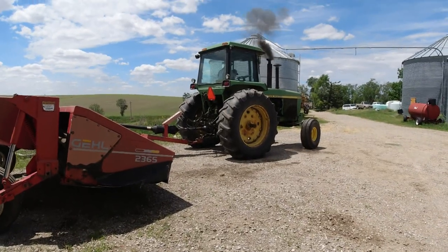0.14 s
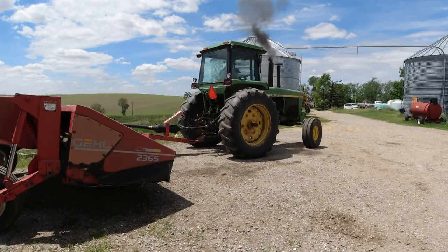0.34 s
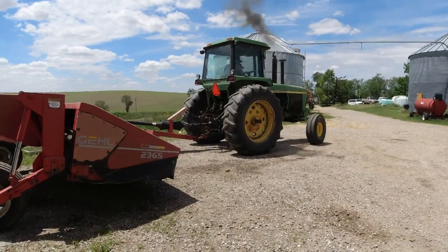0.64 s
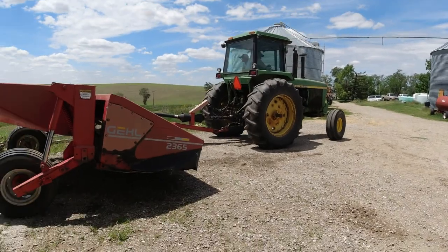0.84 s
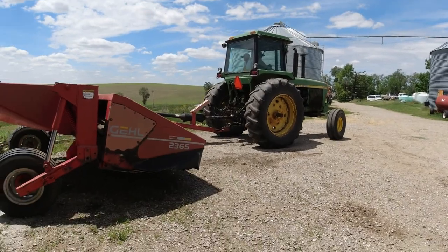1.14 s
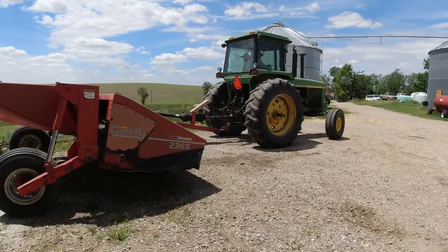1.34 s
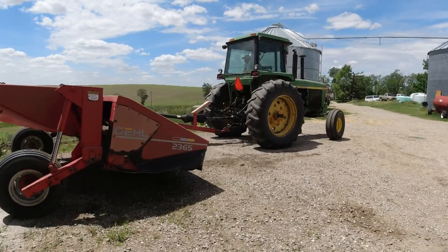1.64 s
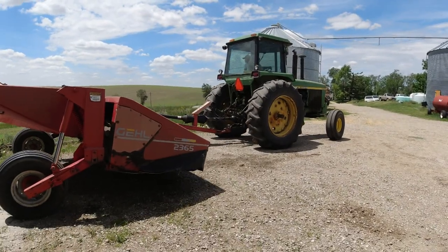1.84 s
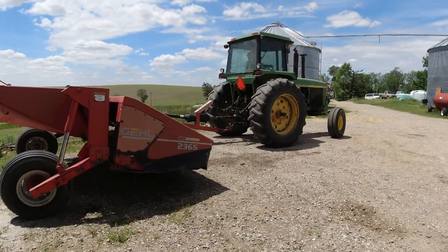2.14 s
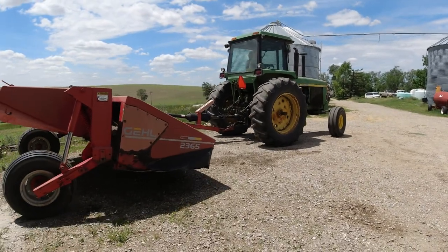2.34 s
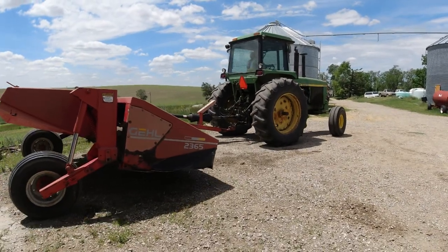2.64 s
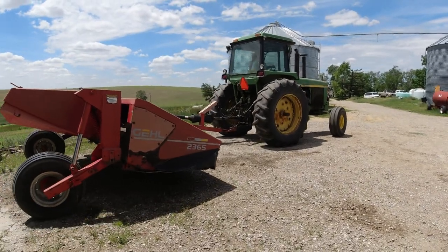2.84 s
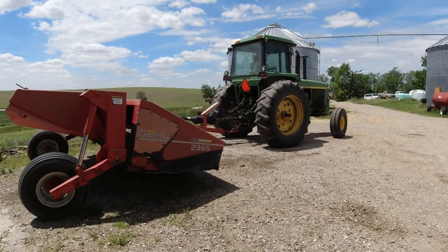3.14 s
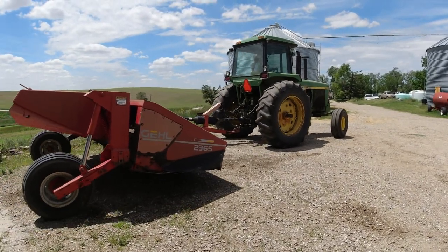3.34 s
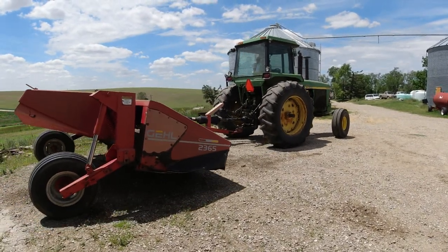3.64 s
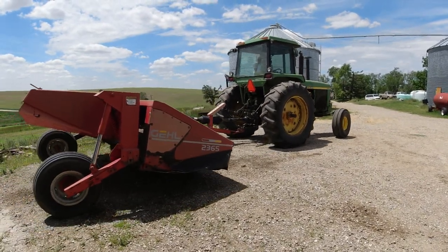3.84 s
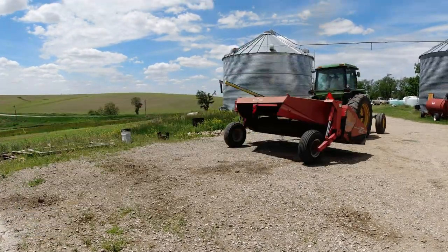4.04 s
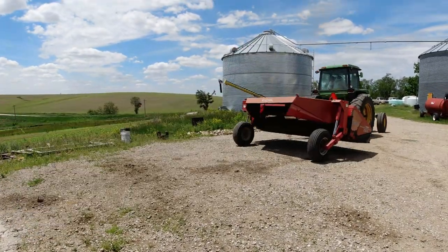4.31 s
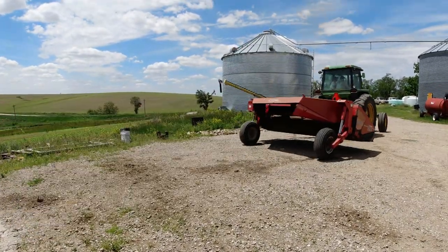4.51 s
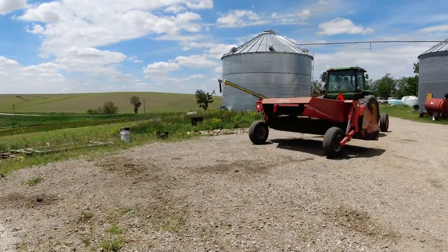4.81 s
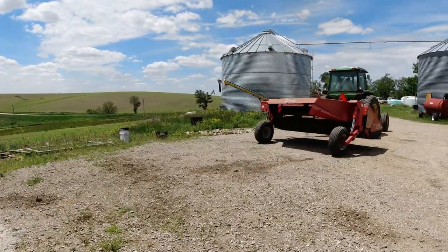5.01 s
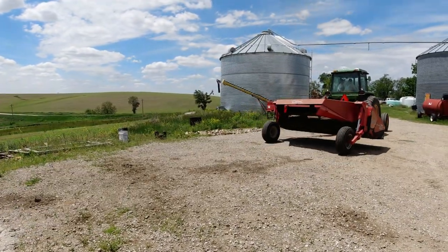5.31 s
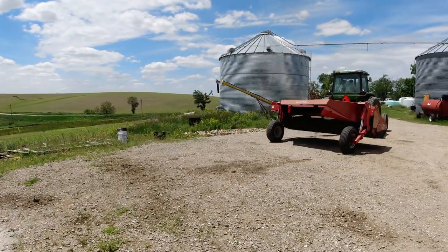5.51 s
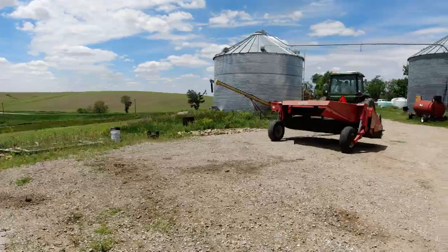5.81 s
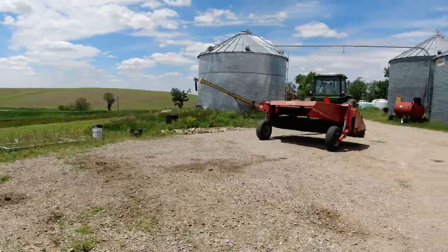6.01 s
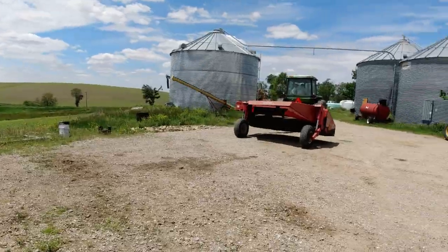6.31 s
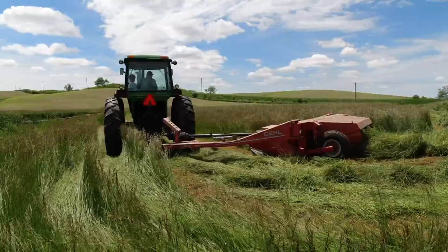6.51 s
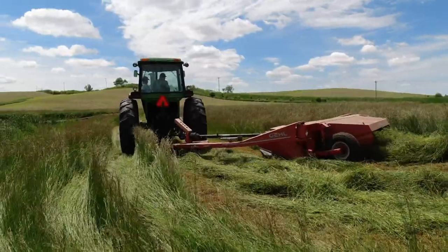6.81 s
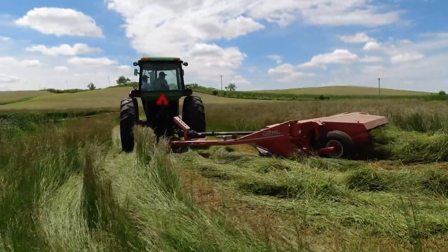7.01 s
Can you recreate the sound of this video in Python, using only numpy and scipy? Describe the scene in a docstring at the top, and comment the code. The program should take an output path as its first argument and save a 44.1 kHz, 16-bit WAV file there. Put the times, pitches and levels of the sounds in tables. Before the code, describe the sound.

From 0 to 0.7 s a six-cylinder diesel runs down from about 44 to 32 firings a second, barking then clattering, with a clank at 0.3 and a high screech near 0.66. An abrupt click at 0.73 changes the perspective: until 3.9 s it idles lumpily near 35 firings a second, with heavy puffs at 1.6, 2.6 and 3.0. The mower scrapes and drones every 0.34 s, with short steel squeaks and clanks at 1.2, 2.45-2.65 and 3.1. At 3.9 s another cut: a smooth deep boom around 61 Hz, fan hum, wavering gear whine and faint gravel ticks; clatter recedes, the boom sinks around 5.7-6.1 and partly recovers. At 6.5 s a cut to mowing until 7.2: faster throbbing exhaust near 85 Hz, dense cutter roar, wavering howl, booming wads and crackling hay. Faint open air throughout.

```python
"""A six-cylinder diesel tractor drops to a hunting idle, puffing and clattering, its mower turning slowly.
The view switches abruptly as it idles: the mower rubs once a turn, screeches and clanks.
A third passage drives off with a booming exhaust; the fourth mows hay at working speed.
Exhaust, fan and gears are tones locked to the firing rate; block, cutter, hay and rubbing are coloured
noise, knocks and harmonics; clanks are noise bursts with ringing modes. Faint open air runs throughout."""
import sys
import numpy as np
from scipy import signal
from scipy.fft import rfft, irfft, next_fast_len
from scipy.io import wavfile
from scipy.ndimage import uniform_filter1d, map_coordinates

SR = 44100
rng = np.random.default_rng(int(sys.argv[2]) if len(sys.argv) > 2 else 0)


def wav_record(signal):
    """Record a signal, one row per channel, as 16-bit PCM in the file named by sys.argv[1]."""
    frames = np.transpose(np.atleast_2d(signal))
    bounded = np.clip(frames, -1, 1)
    # unit amplitude maps onto the largest positive 16-bit level
    quanta = np.round(bounded * 32767).astype(np.int16)
    wavfile.write(sys.argv[1], SR, quanta)


N = 315756
TIME = np.arange(N) / SR

# bounds of the four passages: (time [s])
CUTS = [0, .725, 3.904, 6.503, 7.2]
START_S, SETTLED_S, LEAVING_S, FIELD_S, END_S = CUTS
# clicks where passages meet: (time [s], level [dB])
CUT_CLICKS = [(0.725, -25), (3.904, -18.5), (6.503, -20)]
# stereo width of every noise bed: (frequency [Hz], side against mid [dB])
WIDTH = [(250, -23), (700, -24.5), (1400, -15.5), (2800, -7.5), (5600, -3), (12000, 1)]
TOP_HZ = 16000  # upper limit of the sound

# Spectra are relative: every noise bed is brought to rms 1. Spreads are those of bell-shaped swells.
# spectrum of open air: (frequency [Hz], density [dB per Hz])
AIR_SPECTRUM = [(30, -14), (300, -13), (3000, -29), (9000, -51.5), (16000, -51.5)]

# stones ticking under the tyres: (time [s], level [dB])
GRAVEL_TICKS = [(4.048, -57), (4.445, -56), (4.932, -58), (5.282, -55)]
# spectrum of a grinding stone: (frequency [Hz], density [dB per Hz])
STONE_SPECTRUM = [(1500, -23), (3000, -2), (4000, -0.5), (5000, -8), (6500, -15), (8500, -44)]
STONE_SPREAD_S = .007

# clanks of the drive line: (time [s], crack [dB], steel ring [dB], steel brightness [dB per octave],
# hood ring [dB], bar knock [dB])
CLANKS = [(.309, -37.5, -47.5, 11, -36.5, -32.5), (1.195, -58, -81, 0, -67, -35),
          (2.441, -34, -42, -8, -44, -43), (2.511, -42, -75, 1, -43, -49),
          (2.664, -31, -73, 0, -37.5, -27.5), (3.073, -41, -68, 0, -46, -58)]
# ringing modes of the steel parts: (frequency [Hz], level [dB], decay by 60 dB [s])
STEEL_MODES = [(5426, -12, .15), (6158, -4, .05), (6591, -5, .3), (7550, -14, .081), (8200, -18, .04),
               (9272, -9, .15), (10500, -11, .055), (10960, -15, .04), (12350, -23, .07)]
# ringing modes of the sheet hood: (frequency [Hz], level [dB], decay by 60 dB [s])
HOOD_MODES = [(544, -5, 0.35), (831, 10.5, 0.096), (895, 6, 0.24), (1013, 0, 0.37), (1020, -2.5, 0.29),
              (1235, -6, 0.1), (2300, 5, 0.096)]
# ringing modes of the knocked bar: (frequency [Hz], level [dB], decay by 60 dB [s])
BAR_MODES = [(2380, -12, 0.033), (3450, -12, 0.15), (3980, -5.5, 0.025), (3840, -13, 0.06),
             (4900, -14.5, 0.11), (6170, -22, 0.16)]
# spectrum of a clank's crack: (frequency [Hz], density [dB per Hz])
CRACK_SPECTRUM = [(600, 9.5), (1300, 9.5), (2400, 1.5), (3600, 6.5), (4700, -4.5), (6300, -1.5),
                  (7800, -21), (11000, -65), (15000, -66)]
CRACK_RISE_S = 0.0012
CHATTER_RAD, CHATTER_S = 0.57, 0.023  # phase shake of a struck part (rms), its decay constant

# successive turns of the mower: (scrape [dB], hood drone [dB])
RUBS = [(-62, -42.5), (-51, -39.5), (-52.5, -42), (-50.5, -41), (-50.5, -42), (-48.5, -38), (-50, -37),
        (-52, -39), (-51.5, -38.5)]
FIRST_RUB_S, TURN_S, RUB_SPREAD_S = 0.8526, .3435, 0.057
# screeches of steel on steel: (time [s], spread [s], pitch [Hz], level [dB])
SCREECHES = [(0.66, 0.041, 4080, -45), (0.87, 0.059, 1805, -44), (0.884, 0.028, 2115, -48.5),
             (0.872, 0.031, 3985, -49), (0.902, .025, 6130, -57), (1.087, 0.23, 1754, -52),
             (1.2, 0.011, 3960, -45), (1.55, 0.017, 4232, -56), (1.891, 0.016, 5417, -50),
             (2.239, 0.023, 4203, -51), (2.488, 0.039, 1031, -40.5), (2.583, 0.065, 6120, -56),
             (2.628, .01, 3040, -45), (2.878, .008, 3103, -43), (2.906, 0.041, 4070, -53),
             (2.908, 0.0098, 5700, -51.5), (3.08, 0.011, 5500, -48), (3.615, 0.057, 5388, -59)]
SCREECH_GRIT_DB = -7  # scraping that comes with a screech, against it
SCREECH_WAVER, SCREECH_WIDTH = 0.012, .13  # pitch unsteadiness and roughness rate, shares of the pitch
# spectrum of the scrape: (frequency [Hz], density [dB per Hz])
SCRAPE_SPECTRUM = [(900, -5.5), (1800, -7.5), (2700, 6.5), (4100, 1), (4900, -4.5), (6200, -7), (7200, -15),
                   (8500, -36.5), (13000, -40), (16000, -58)]
# resonances and dips of the mower's steel frame: (centre [Hz], width [Hz], lift [dB])
FRAME = [(1740, 63, -6), (2190, 42, 5.5), (2510, 88, 10.5), (3550, 91, 8), (4130, 270, 6), (4600, 55, 6),
         (5270, 160, 10), (6080, 59, 11.5)]
# spectrum of the hood's drone: (frequency [Hz], density [dB per Hz])
DRONE_SPECTRUM = [(150, 4.5), (330, -7.5), (550, 1), (950, -5.5), (1200, -7.5), (2000, -20), (4000, -53)]
DRONE_SLIDE_S, DRONE_SPLIT_HZ = 0.023, 780  # the drone's top comes this early, its bottom this late
# spectrum of a short thin hiss: (frequency [Hz], density [dB per Hz])
SIZZLE_SPECTRUM = [(5500, -39), (6600, 4), (7500, 1), (8200, -7), (9200, -35)]
SIZZLE_S, SIZZLE_SPREAD_S, SIZZLE_DB = 0.684, 0.035, -62

# knock strength of each cylinder, in firing order: (level [dB])
CYLINDERS = [.9, -.9, .6, -.5, 1, -1.1]

# engine speed at idle: (time [s], firing rate [1/s])
IDLE_SPEED = [(0, 44), (.13, 42), (.28, 37.7), (.42, 34.9), (.57, 32.1), (.85, 36.9), (1.2, 34.6),
              (1.5, 35.9), (1.61, 36.6), (1.8, 35.4), (2.01, 32.4), (2.23, 35.3), (2.45, 31.6), (2.7, 37),
              (2.84, 36.3), (2.95, 35.2), (3.37, 35.9), (3.49, 35.9), (3.9, 33.7)]
# idle levels: (time [s], exhaust hum at twice the firing rate [dB], block clatter [dB])
IDLE_LEVELS = [(0, -46, -35), (.3, -46, -38), (.5, -37, -38.5), (1, -36, -41), (1.45, -37.5, -41),
               (2.25, -49, -41.5), (2.8, -36, -41), (3.15, -45.5, -41.5), (3.48, -37.5, -43),
               (3.9, -57, -42)]
# exhaust bark at idle, loudest while the engine runs down: (time [s], third harmonic [dB])
BARK = [(0, -32.5), (.25, -39), (.45, -47), (.9, -48.5), (1.5, -51.5), (2.3, -53.5), (2.8, -51),
        (3.9, -50.5)]
# bursts of fuel from the governor: (time [s], half length [s], thump [dB])
FUEL_BURSTS = [(0.64, 0.087, -30.5), (1.584, 0.027, -27), (2.61, 0.043, -25), (2.964, 0.034, -25)]
BURST_SECOND_DB, BURST_THIRD_DB, BURST_GROWL_DB = -12.5, -11, -19  # overtones and growl, against a thump
LOPE_DB = -47.5  # firing tone between bursts
# spectrum of the idling block's clatter: (frequency [Hz], density [dB per Hz])
IDLE_BLOCK = [(50, 5.5), (120, 5.5), (160, -2.5), (200, -15), (280, -12), (370, -7), (640, -14), (760, -16),
              (1000, -17.5), (1200, -14.5), (1900, -16.5), (3300, -21.5), (4700, -35), (6300, -32.5),
              (8500, -68), (16000, -92)]
# colouring of the idling block's growl: (frequency [Hz], density [dB per Hz])
IDLE_GROWL = [(90, -38), (160, 0.5), (230, -3), (290, -6), (370, 2.5), (640, -9.5), (760, -8), (1000, -8.5),
              (1300, -26)]
GROWL_DB, LOPING_DB = -4, -10  # growl against clatter; the six-firing pattern against the every-firing one
# block and panel resonances and dips, engine running down: (centre [Hz], width [Hz], lift [dB])
SLOWING_PANELS = [(352, 49, 3.5), (743, 85, 12.5), (923, 92, 8.5), (1360, 65, 3.5), (2135, 54, 8),
                  (3410, 130, 9.5), (4150, 150, -1), (4700, 59, 12.5), (5000, 360, 8.5), (6350, 150, -11)]
# the same from another side, at steady idle: (centre [Hz], width [Hz], lift [dB])
PANELS = [(228, 30, 6.5), (342, 39, 7.5), (554.5, 25, 9), (591, 48, -5), (736, 89, 7.5), (866, 48, 5.5),
          (958, 53, 8), (1136, 67, -8), (1725, 70, 7), (1787, 39, 11.5), (2196, 70, 6), (3434, 72, 6.5)]

# engine speed driving off: (time [s], firing rate [1/s])
DRIVE_SPEED = [(4.1, 60.7), (4.6, 61.8), (4.9, 61.4), (5.3, 62.3), (5.6, 61), (5.9, 61.9)]
# exhaust boom driving off: (time [s], firing tone [dB], second harmonic [dB])
BOOM = [(3.9, -21, -42.5), (4.4, -20.4, -38.5), (4.7, -20.5, -34.5), (5.17, -22, -34.5), (5.4, -23, -44.5),
        (5.5, -26, -49), (5.72, -35, -36), (6.08, -37, -35), (6.3, -28.5, -33), (6.5, -27.5, -38.5)]
# turning parts driving off: (time [s], fan tone [dB], gear whine [dB])
WHINE = [(3.9, -44, -69), (4.15, -46.5, -67), (4.55, -37.5, -53), (4.95, -46, -60.5), (5.37, -38, -51.5),
         (5.8, -57, -62.5), (6.48, -38.5, -45.5)]
# spectrum of the block's clatter driving off: (frequency [Hz], density [dB per Hz])
DRIVE_BLOCK = [(130, -46), (230, -11.5), (300, -2.5), (370, -14), (520, -11), (640, -13), (930, -16),
               (1500, -25), (3100, -27.5), (4500, -42), (5300, -36.5), (6500, -36.5), (8000, -69.5),
               (16000, -79.5)]
# colouring of the block's growl driving off: (frequency [Hz], density [dB per Hz])
DRIVE_GROWL = [(150, -44), (240, -5.5), (310, 1.5), (400, -5), (500, -3), (640, -12), (770, -4.5),
               (930, -8.5), (1150, -17)]
DRIVE_GROWL_DB = -2.5  # against the clatter
# block and panel resonances driving off: (centre [Hz], width [Hz], lift [dB])
DRIVE_PANELS = [(334, 93, 1.6), (551, 57, 5.1), (768, 42, 4), (923, 120, 6), (1820, 86, 6.7),
                (3860, 92, 10), (5350, 300, 6)]
# spectrum of the low rumble driving off: (frequency [Hz], density [dB per Hz])
DRIVE_RUMBLE = [(20, -7.5), (50, -0.5), (100, 7.5), (180, 5.5), (230, -10.5), (400, -61.5)]
LEAVING_DB, GONE_DB, RECEDE_S = -42, -47.5, 0.56  # clatter at first, far off, and its decay constant
TAKE_UP_DB, TAKE_UP_FAN_DB, TAKE_UP_SPREAD_S = -49.5, -49, 0.46  # tooth tone and fan octave at take-up

THROB_DB, THROB_DEPTH, THROB_PERIOD_S, THROB_PEAK_S = -30, 0.58, 0.132, 6.868  # mean level, share of it
# wads of hay entering the cutter: (time [s], spread [s], boom pitch [Hz], level [dB])
WADS = [(6.512, 0.014, 170.8, -33), (6.563, 0.025, 312, -35.5), (6.79, 0.022, 228, -32),
        (6.837, 0.035, 183.4, -32), (6.9, 0.018, 340, -33.5), (7.119, 0.02, 226, -33),
        (7.13, 0.017, 290, -34)]
# howling shafts of the cutter: (multiple of the firing rate, level [dB])
HOWL = [(1.33, -42.5), (2.3, -44), (2.73, -45), (4, -46), (7.4, -53), (9.35, -53), (10.4, -53),
        (11.85, -57), (15.75, -54)]
HOWL_WAVER, HOWL_FLUTTER_DB = .02, 4  # unsteadiness of speed, as a share, and of level
# spectrum of the cutter's roar: (frequency [Hz], density [dB per Hz])
CUTTER_SPECTRUM = [(25, -12), (60, 8), (110, 7), (145, 5), (190, -4), (270, 7), (350, 2.5), (410, -1),
                   (520, -13.5), (900, -56)]
# spectrum of the rushing hay: (frequency [Hz], density [dB per Hz])
CROP_SPECTRUM = [(260, -38), (450, -11), (568, -10), (614, -5.5), (786, 0), (1090, -3.5), (1360, -5),
                 (1630, -13.5), (2340, -9.5), (3540, -23.5), (4030, -30.5), (4600, -23.5), (6190, -25),
                 (8560, -52.5), (10000, -83), (13000, -86), (22000, -120)]
# resonances of the mower's drum and hood: (centre [Hz], width [Hz], lift [dB])
DRUM = [(186, 78, 0.5), (1710, 50, 4.5), (2370, 130, 2.5), (2780, 280, 4), (3520, 400, 3.5)]
ROAR_DB, RUSH_DB = -37, -39.5
SURGE_DB, SURGE_PERIOD_S, SURGE_PEAK_S = 0.5, 0.069, 6.3  # regular swing of the upper rattle
CRUNCH_S, CRUNCH_SPREAD_S, CRUNCH_DB = 7.118, 0.013, 2  # brief lift of the rush as a wad is cut


def amp(db):
    """Decibels to gain."""
    return 10 ** (np.asarray(db) / 20)


def unit(x):
    """x at rms 1."""
    return x / np.sqrt(np.mean(x ** 2) + 1e-20)


def along(points, hz):
    """(Hz, value) points read on a log axis."""
    f, v = np.transpose(points)
    return np.interp(np.log(hz + 1), np.log(f + 1), v)


def curves(rows):
    """One value per sample for each column after the time."""
    s, *columns = np.transpose(rows)
    return [np.interp(TIME, s, column) for column in columns]


def swell(s, spread):
    """A bell-shaped rise and fall, 1 at time s."""
    return np.exp(-.5 * ((TIME - s) / spread) ** 2)


def wobble(rate):
    """A smooth random curve, rate knots a second."""
    coarse = TIME[::16]
    knots = rng.standard_normal(int(N * rate / SR) + 4)
    return np.interp(TIME, coarse, map_coordinates(knots, [coarse * rate], mode="nearest"))


def filtered(x, response):
    """x passed through a complex response of frequency."""
    size = next_fast_len(N + 8192)
    return irfft(rfft(x, size) * response(np.fft.rfftfreq(size, 1 / SR)), size)[..., :N]


def noise(spectrum, resonances=(), source=None):
    """Stereo sound of rms 1: white noise, or a given source, coloured by a spectrum and resonances."""
    def colour(hz):
        lift_db = sum(db / (1 + (2 * (hz - centre) / width) ** 2) for centre, width, db in resonances)
        side_db = along(WIDTH, hz) * np.array([[0], [1]])
        return amp(along(spectrum, hz) + lift_db + side_db)

    if source is None:
        source = rng.standard_normal((2, N))
    mid, side = filtered(source, colour)
    return unit(np.array([mid + side, mid - side]))


def tone(cycles, order):
    """A sine of rms 1 at a multiple of the given cycles."""
    return np.sqrt(2) * np.sin(2 * np.pi * (order * cycles + rng.random()))


def grains(rate, t60, spread_db):
    """White grit: rate little pings a second, each with its own pitch and size, in a two-second loop."""
    loop = 2 * SR
    age = np.arange(int(t60 * SR / 2)) / SR
    count = int(rate * loop / SR)
    start, pitch, side = rng.random((count, 3)).T
    size = amp(spread_db * np.clip(rng.standard_normal(count), -2, 2))
    waves = np.sin(np.pi * SR / 2 * pitch[:, None] * age)
    pings = size[:, None] * waves * amp(-60 * age / t60)
    places = ((start * loop).astype(int)[:, None] + np.arange(len(age))) % loop
    channels = []
    for share in (np.cos, np.sin):
        placed = pings * share(2 * np.pi * side)[:, None]
        once = np.bincount(places.ravel(), placed.ravel(), loop)
        channels.append(np.resize(once, N))
    return unit(np.array(channels))


def modes(table, age):
    """Ringing of rms about 1 at first: decaying sines, each at a new strength, rough while chattering."""
    ring = np.zeros(len(age))
    for hz, db, t60 in table:
        rough = uniform_filter1d(rng.standard_normal(len(age)), size=70)
        rough = unit(uniform_filter1d(rough, size=40))
        shake = CHATTER_RAD * np.exp(-age / CHATTER_S) * rough
        level = amp(db + rng.normal(0, 0.47) - 60 * age / t60)
        ring += level * np.sin(2 * np.pi * (hz * age + rng.random()) + shake)
    return ring * (1 - np.exp(-age / 0.0035))


def knocks(cycles, t60, fresh, wash, scatter_db):
    """White knocking: each cylinder rings the castings in a fixed way, plus a fresh rattle every firing."""
    firings = np.flatnonzero(np.diff(np.floor(cycles), prepend=-1) > 0)
    age = np.arange(SR // 4) / SR
    fade = amp(-60 * age / t60) * (1 - np.exp(-age / 0.0038))
    ring, blows = np.zeros((2, N)), np.zeros(N)
    for k, db in enumerate(CYLINDERS):
        own = firings[k::len(CYLINDERS)]
        hits = np.zeros(N)
        hits[own] = amp(db + scatter_db * rng.standard_normal(size=200)[:len(own)])
        casting = fade * rng.standard_normal((2, len(age)))
        ring += signal.oaconvolve(hits[None], casting, axes=1)[:, :N]
        blows += hits ** 2
    rattle_level = np.sqrt(abs(signal.oaconvolve(blows, fade ** 2)[:N]))
    rattle = rattle_level * rng.standard_normal((2, N))
    # an even wash fills the gaps between firings
    return unit(unit(ring) + fresh * unit(rattle) + wash * rng.standard_normal((2, N)))


def growl(turns, count, size=2048):
    """What repeats exactly on every turn of a shaft: equal harmonics, ready for the panels to colour."""
    harmonics = np.pad(np.exp(2j * np.pi * rng.random((2, count))), ((0, 0), (1, 0)))
    waves = irfft(harmonics, size)
    return np.array([np.interp(turns % 1, np.arange(size) / size, wave) for wave in waves])


def shifting(turns, count, rate):
    """A growl whose harmonics come and go as the tractor moves past the listener."""
    angle = wobble(rate)
    return np.cos(angle) * growl(turns, count=count) + np.sin(angle) * growl(turns, count=count)


def open_air():
    """Faint steady air: noise falling off towards the treble."""
    return amp(-61.5) * noise(AIR_SPECTRUM)


def cut_clicks(decay=0.0032):
    """Where passages meet the pressure jumps and dies away: a small click."""
    return sum(amp(db) * (TIME >= s) * np.exp(-abs(TIME - s) / decay) for s, db in CUT_CLICKS)


def gravel():
    """Now and then a stone grinds under a tyre: a short swell of noise."""
    ticks = sum(amp(db) * swell(s, STONE_SPREAD_S) for s, db in GRAVEL_TICKS)
    return ticks * noise(STONE_SPECTRUM)


def clanks():
    """Drive-line slack takes up: a crack with a short rattle, a knock and ring of steel, the hood answering."""
    crack, ring = np.zeros(N), np.zeros(N)
    age = np.arange(SR // 2) / SR
    # the blow itself, then the parts chattering
    burst = amp(-60 * age / .06) + .35 * amp(-60 * age / .2)
    burst *= 1 - np.exp(-age / CRACK_RISE_S)
    tilt_hz = STEEL_MODES[2][0]  # brightness tilts the steel around this mode
    for s, crack_db, steel_db, bright_db, hood_db, bar_db in CLANKS:
        steel = [(hz, db + bright_db * np.log2(hz / tilt_hz), t60) for hz, db, t60 in STEEL_MODES]
        first = round(s * SR)
        span = slice(first, first + len(age))
        crack[span] += amp(crack_db) * burst
        ring[span] += amp(steel_db) * modes(steel, age)
        ring[span] += amp(bar_db) * modes(BAR_MODES, age)
        # the hood answers more slowly
        ring[span] += amp(hood_db) * modes(HOOD_MODES, age) * (1 - np.exp(-age / 0.013))
    return crack * noise(CRACK_SPECTRUM, FRAME) + ring


def contacts(column, late):
    """One swell per turn of the mower, at the level in a column of the rubs."""
    first = FIRST_RUB_S + late
    return sum(amp(row[column]) * swell(first + turn * TURN_S, RUB_SPREAD_S) for turn, row in enumerate(RUBS))


def hood_drone():
    """Each contact sets the hood droning; the drone falls, its top swelling before its bottom."""
    hood = unit(amp(2.5 * wobble(50))) * noise(DRONE_SPECTRUM, PANELS)
    bottom = filtered(hood, lambda hz: 1 / (1 + (hz / DRONE_SPLIT_HZ) ** 8))
    top = hood - bottom
    return contacts(1, -DRONE_SLIDE_S) * top + contacts(1, DRONE_SLIDE_S) * bottom


def rubs():
    """The mower rubs once a turn, scraping and droning; now and then one steel resonance screeches."""
    scrape, screech = contacts(0, 0), np.zeros(N)
    for s, spread, hz, db in SCREECHES:
        strength = amp(db) * swell(s, spread)
        pitch = hz * (1 + SCREECH_WAVER * wobble(60))
        # rough contact spreads the pitch
        screech += strength * wobble(SCREECH_WIDTH * hz) * np.sin(2 * np.pi * np.cumsum(pitch) / SR)
        scrape = np.hypot(scrape, amp(SCREECH_GRIT_DB) * strength)
    # the steel sticks and slips
    grit = unit(amp(3 * wobble(90) + 2 * wobble(450)))
    rough = grit * rng.standard_normal((2, N)) + .7 * grains(rate=1300, t60=.03, spread_db=2)
    crunch = noise(SCRAPE_SPECTRUM, FRAME, rough)
    sizzle = amp(SIZZLE_DB) * swell(SIZZLE_S, SIZZLE_SPREAD_S) * noise(SIZZLE_SPECTRUM)
    return scrape * crunch + grit * (screech + sizzle) + hood_drone()


def idle_exhaust(cycles, thump):
    """Puffs at the firing rate and two overtones, swelling whenever the governor gives a burst of fuel."""
    hum_db, _ = curves(IDLE_LEVELS)
    bark_db, = curves(BARK)
    # the crank turns unevenly at idle, and no two puffs are alike
    uneven = cycles + .02 * wobble(22)
    lope = np.hypot(amp(LOPE_DB + 2.6 * wobble(9.8)), thump)
    hum = np.hypot(amp(hum_db + 3.3 * wobble(20)), amp(BURST_SECOND_DB) * thump)
    bark = np.hypot(amp(bark_db + 1.6 * wobble(16)), amp(BURST_THIRD_DB) * thump)
    return lope * tone(uneven, order=1) + hum * tone(uneven, order=2) + bark * tone(uneven, order=3)


def idle_block(cycles, thump):
    """Castings knock at every firing and growl in repeating harmonics, coloured by block and panels."""
    _, clatter_db = curves(IDLE_LEVELS)

    def heavy(hz):
        return 1 / (1 + (hz / 1300) ** 4)

    def light(hz):
        return np.sqrt(1 - heavy(hz) ** 2)

    # heavy castings ring on between firings; the treble comes in sharper knocks
    low = filtered(knocks(cycles, t60=0.29, fresh=0.5, wash=0.64, scatter_db=-1.0), heavy)
    high = filtered(knocks(cycles, t60=0.12, fresh=0.4, wash=0.46, scatter_db=1.5), light)
    every_firing = unit(growl(cycles, count=36))
    every_six = unit(growl(cycles / len(CYLINDERS), count=216))
    harmonics = every_firing + amp(LOPING_DB) * every_six
    effort = np.hypot(amp(clatter_db + GROWL_DB), amp(BURST_GROWL_DB) * thump)

    def seen_through(panels):
        clatter = amp(clatter_db) * noise(IDLE_BLOCK, panels, low + high)
        return clatter + effort * noise(IDLE_GROWL, panels, harmonics)

    return np.where(TIME < SETTLED_S, seen_through(SLOWING_PANELS), seen_through(PANELS))


def idle():
    """The governor hunts: bursts of fuel give a few heavy puffs over the growling, clattering block."""
    speed, = curves(IDLE_SPEED)
    cycles = np.cumsum(speed) / SR
    thump = sum(amp(db) * np.exp(-.5 * ((TIME - s) / half) ** 4) for s, half, db in FUEL_BURSTS)
    return idle_exhaust(cycles, thump) + idle_block(cycles, thump)


def drive_exhaust(cycles):
    """The stack booms at the firing rate, with weaker wavering harmonics."""
    first_db, second_db = curves(BOOM)
    exhaust = amp(first_db) * tone(cycles, order=1) + amp(second_db) * tone(cycles, order=2)
    exhaust += amp(-52.0 + 2.3 * wobble(2.6)) * tone(cycles, order=3)
    exhaust += amp(-58.5 + 3.2 * wobble(13)) * tone(cycles, order=5)
    exhaust += amp(-55.0 + 1.7 * wobble(4.7)) * tone(cycles, order=1.5)  # unequal cylinders
    return exhaust


def fan_and_gears(cycles):
    """Blades and teeth sing at fixed multiples of the firing rate, with extra tones as load is taken up."""
    fan_db, gear_db = curves(WHINE)
    take_up = swell(LEAVING_S, TAKE_UP_SPREAD_S)
    fan = amp(fan_db + 1.1 * wobble(8.1)) * tone(cycles, order=8 / 3)
    fan_octave = tone(cycles + 0.033 * wobble(30), order=16 / 3)
    fan += amp(TAKE_UP_FAN_DB + 3 * wobble(22)) * take_up * fan_octave
    # backlash makes the teeth run unevenly
    mesh = cycles + .012 * wobble(28)
    gears = amp(gear_db + 4.3 * wobble(12)) * tone(mesh, order=8.5)
    gears += amp(TAKE_UP_DB + 4.0 * wobble(8.2)) * take_up * tone(mesh, order=15.3)
    return fan + gears


def drive_block(cycles):
    """Block clatter and a growl repeating on every crank turn, both fading as the tractor recedes."""
    away = np.exp(-np.maximum(TIME - LEAVING_S, 0) / RECEDE_S)
    clatter_db = GONE_DB + (LEAVING_DB - GONE_DB) * away
    knocking = knocks(cycles, t60=0.15, fresh=.4, wash=0.55, scatter_db=1)
    clatter = noise(DRIVE_BLOCK, DRIVE_PANELS, knocking)
    crank = shifting(2 * cycles / len(CYLINDERS), count=56, rate=2)
    return amp(clatter_db) * (clatter + amp(DRIVE_GROWL_DB) * noise(DRIVE_GROWL, source=crank))


def drive():
    """The tractor drives off: exhaust, fan, gears and block follow one firing rate, over a low rumble."""
    speed, = curves(DRIVE_SPEED)
    cycles = np.cumsum(speed + .1 * wobble(8)) / SR
    rumble = amp(-42) * noise(DRIVE_RUMBLE)
    return drive_exhaust(cycles) + fan_and_gears(cycles) + drive_block(cycles) + rumble


def howl(cycles):
    """The cutter's shafts each sing at their own rate and waver as the hay drags on them."""
    total = np.zeros(N)
    for multiple, db in HOWL:
        dragged = np.cumsum(np.gradient(cycles) * (1 + HOWL_WAVER * wobble(22)))
        total += amp(db + HOWL_FLUTTER_DB * wobble(18)) * tone(dragged, order=multiple)
    return total


def wad_booms():
    """Each wad of hay makes the hood boom: a short wavering tone."""
    booms = np.zeros(N)
    for s, spread, hz, db in WADS:
        boom_cycles = np.cumsum(hz * (1 + HOWL_WAVER * wobble(40))) / SR
        booms += amp(db) * swell(s, spread) * tone(boom_cycles, order=1)
    return unit(amp(2.5 * wobble(70))) * booms


def hay_rush(knocking):
    """Stalks crackle over the block's rattle: pings and knocks coloured by drum and hood."""
    stalks = .5 * grains(rate=5000, t60=.012, spread_db=3)
    rush = noise(CROP_SPECTRUM, DRUM, knocking + stalks)
    # the hood's body follows the uneven feed of hay; the rattle above it surges regularly
    body = filtered(rush, lambda hz: 1 / (1 + (hz / 1600) ** 6))
    surge_db = SURGE_DB * np.cos(2 * np.pi * (TIME - SURGE_PEAK_S) / SURGE_PERIOD_S)
    surging = body * amp(wobble(45)) + (rush - body) * amp(surge_db)
    return amp(RUSH_DB + CRUNCH_DB * swell(CRUNCH_S, CRUNCH_SPREAD_S)) * surging


def mow(firing_hz=84.54):
    """Under load the exhaust throbs while the cutter roars and howls and hay booms and crackles through."""
    cycles = np.cumsum(firing_hz + .3 * wobble(6.3)) / SR
    throb = 1 + THROB_DEPTH * np.cos(2 * np.pi * (TIME - THROB_PEAK_S) / THROB_PERIOD_S)
    exhaust = amp(THROB_DB) * throb * tone(cycles, order=1)
    exhaust += amp(-44.5 + 1.5 * wobble(5.1)) * tone(cycles, order=2)
    knocking = knocks(cycles, t60=.16, fresh=.35, wash=.25, scatter_db=1)
    roar = amp(ROAR_DB + 1.5 * wobble(25)) * noise(CUTTER_SPECTRUM, DRUM, knocking)
    return exhaust + roar + howl(cycles) + wad_booms() + hay_rush(knocking)


def passage(sound, first, last, lag_samples):
    """The sound between two times; coming from the right, it reaches the left ear later."""
    def lag(hz):
        return np.exp(1j * np.pi * hz * lag_samples / SR * np.array([[-1], [1]]))

    gate = np.clip(np.minimum(TIME - first, last - TIME) / .002 + .5, 0, 1)  # 2 ms edges
    return filtered(sound, lag) * gate


def scene():
    """The four passages in turn, over faint open air."""
    yard = clanks() + rubs() + idle()
    slowing = passage(yard, START_S, SETTLED_S, lag_samples=0.26)
    idling = passage(yard, SETTLED_S, LEAVING_S, lag_samples=0.86)
    driving = passage(gravel() + drive(), LEAVING_S, FIELD_S, lag_samples=4.4)
    mowing = passage(mow(), FIELD_S, END_S, lag_samples=1.4)
    return open_air() + cut_clicks() + slowing + idling + driving + mowing


def record(dry):
    """A very steep low-pass removes what lies above the upper limit."""
    return filtered(dry, lambda hz: 1 / np.sqrt(1 + (hz / TOP_HZ) ** 120))


dry = scene()
out = record(dry)
wav_record(out)
```